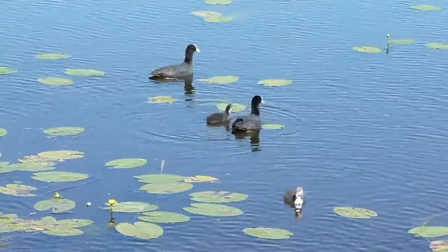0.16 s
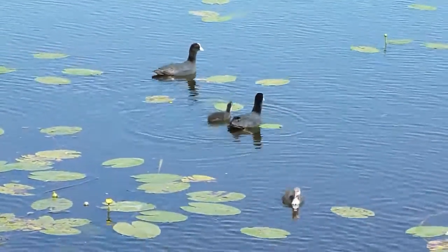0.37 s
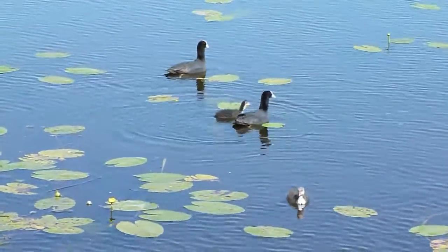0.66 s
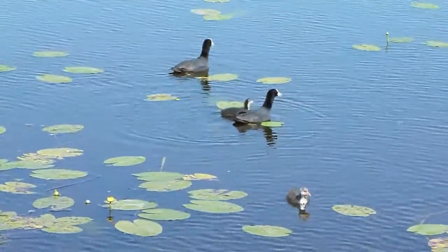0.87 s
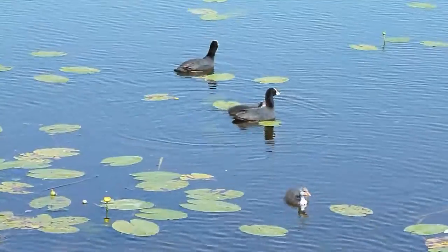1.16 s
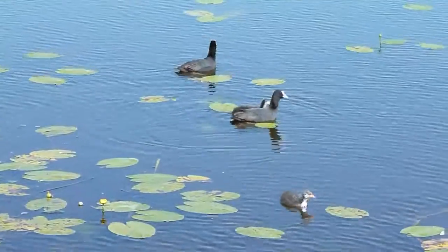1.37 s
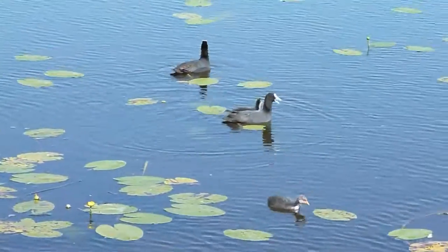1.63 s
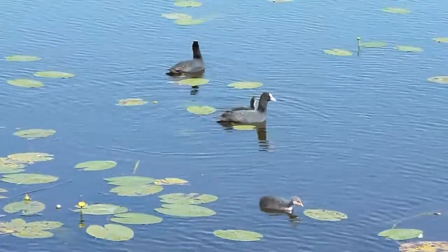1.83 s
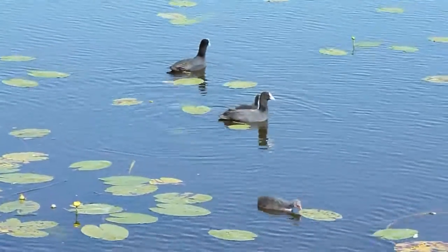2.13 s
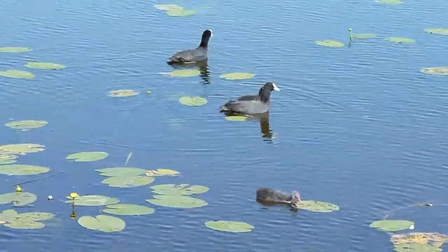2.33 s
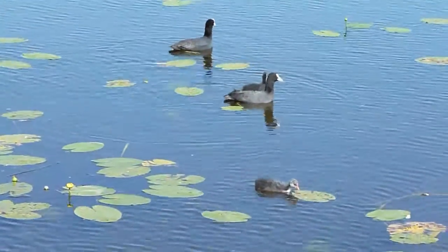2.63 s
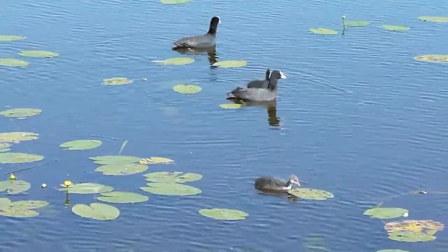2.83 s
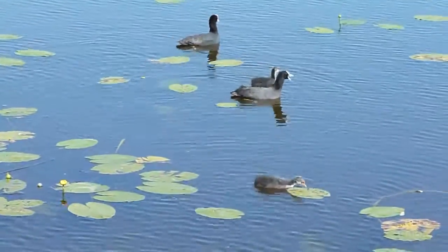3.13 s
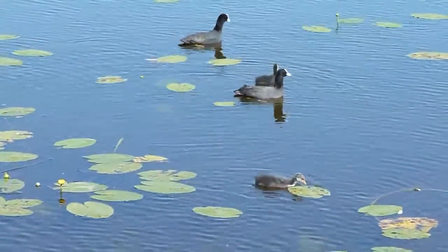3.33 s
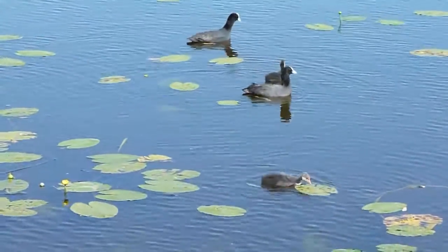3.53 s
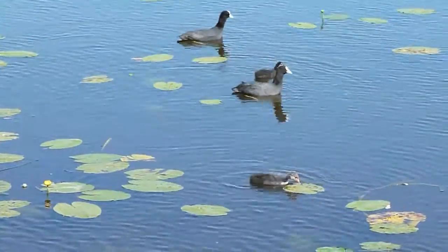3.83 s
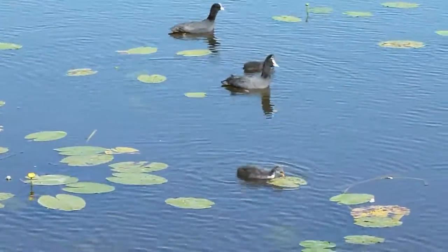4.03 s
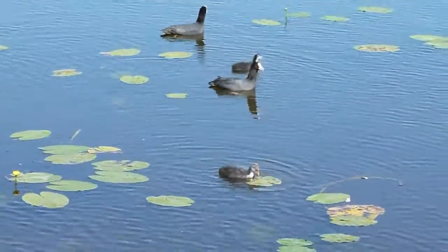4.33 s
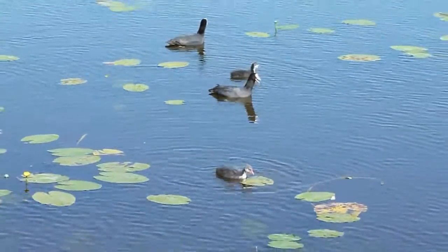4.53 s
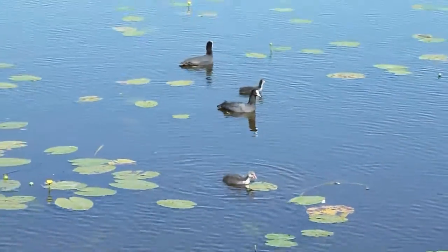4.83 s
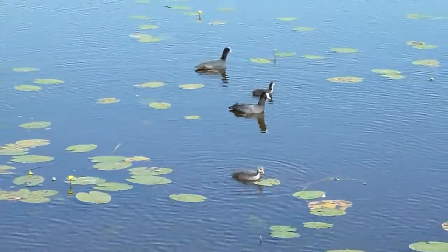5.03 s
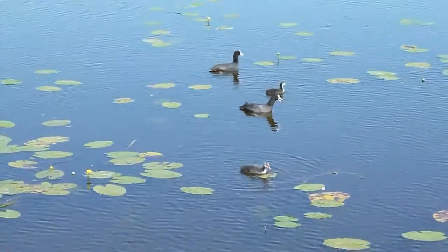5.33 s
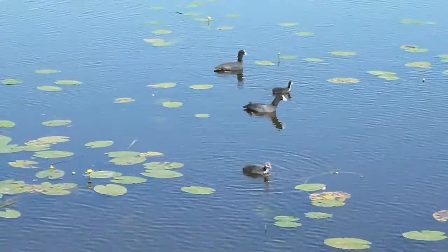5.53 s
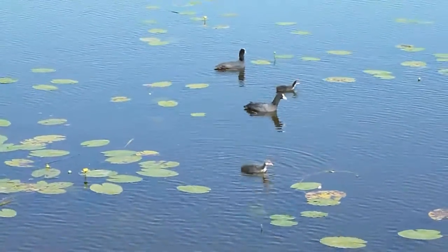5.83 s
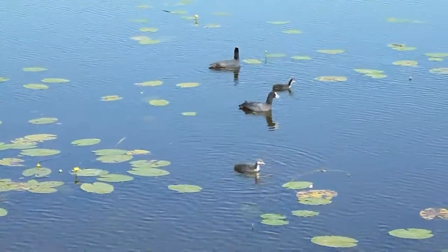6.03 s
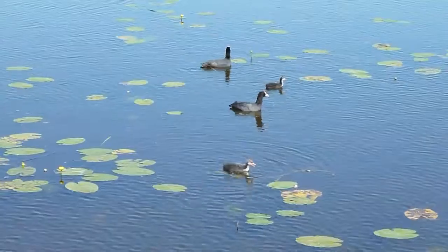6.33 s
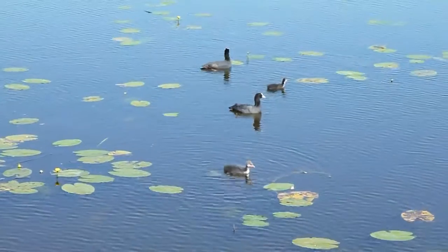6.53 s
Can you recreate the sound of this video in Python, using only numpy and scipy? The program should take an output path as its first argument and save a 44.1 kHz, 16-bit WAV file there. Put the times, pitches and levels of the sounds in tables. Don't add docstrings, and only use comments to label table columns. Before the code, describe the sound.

Outdoor water birds heard through a small, slightly dull stereo camera microphone. Low wind flutter opens over a chick's squealing whistle and yelp; one sharp songbird chip follows, then nasal parent pips spaced well apart. The calmer middle reveals faint engine hum, little water drips, body ticks and a quiet zoom motor. A piercing yelp comes near five seconds, and heavy wind buffets another yelp at the close. Faint echoes return from the banks.

```python
import sys
import numpy as np
from scipy import signal
from scipy.fft import rfft, irfft, next_fast_len
from scipy.io import wavfile
from scipy.ndimage import uniform_filter1d, map_coordinates

SR = 44100
rng = np.random.default_rng(int(sys.argv[2]) if len(sys.argv) > 2 else 0)


def wav_out(sig):
    wavfile.write(sys.argv[1], SR, np.round(np.clip(np.atleast_2d(sig).T, -1, 1) * 32767).astype(np.int16))


def gain_from_decibels(decibels):
    exponent = np.asarray(decibels, float) / 20
    return 10 ** exponent


N = 295166
T = np.arange(N) / SR

# time in seconds, pitch in Hz, level in dB.
SQUEALS = [
    [(0, 2734, -57.5), (.028, 3740, -63), (.06, 3620, -55.5), (.12, 3567, -53.5), (.17, 3644, -46.5),
     (.28, 3755, -47.5)],
    [(1.968, 2350, -65), (1.986, 3050, -50.5), (1.993, 3700, -51), (2.005, 3815, -46), (2.05, 3460, -50.5),
     (2.1, 3536, -42.5), (2.15, 3723, -41.5), (2.19, 4100, -45), (2.21, 4210, -51.5)],
    [(4.725, 4484, -69), (4.74, 4420, -54), (4.838, 4560, -50.5)],
    [(6.185, 2677, -77), (6.212, 3504, -61.5), (6.27, 3283, -68), (6.38, 3381, -60.5), (6.456, 3500, -54)],
]
# time in seconds, pitch in Hz, level in dB.
YELPS = [
    [(.296, 3670, -48), (.301, 3414, -46), (.35, 3456, -47.5), (.382, 3060, -42), (.392, 2560, -50),
     (.403, 2310, -48.5), (.412, 2340, -64)],
    [(2.232, 4220, -48), (2.254, 4060, -42), (2.263, 3647, -36.5), (2.29, 3300, -44), (2.31, 3030, -39),
     (2.331, 2160, -49), (2.34, 2230, -68)],
    [(4.843, 4605, -35.5), (4.849, 4093, -32), (4.882, 4015, -32), (4.889, 3726, -32), (4.91, 3300, -43.5),
     (4.916, 2700, -44), (4.93, 2360, -45.5), (4.94, 2370, -59.5), (4.96, 2240, -67)],
    [(6.461, 3903, -34.5), (6.478, 3913, -36.5), (6.5, 3844, -46), (6.532, 3620, -46.5), (6.554, 3330, -55),
     (6.564, 3070, -43.5), (6.572, 2630, -54), (6.584, 2410, -56), (6.594, 2280, -60)],
]
# time in seconds, pitch in Hz, level in dB.
ARCHES = [
    [(.405, 2960, -67), (.432, 3300, -57), (.475, 3100, -61), (.5, 2750, -63), (.52, 2045, -67)],
    [(2.41, 2710, -71), (2.5, 3070, -62), (2.56, 3250, -72), (2.59, 3090, -61), (2.61, 2783, -77)],
    [(6.503, 2760, -69), (6.512, 2840, -54), (6.54, 2900, -55), (6.553, 3080, -48), (6.56, 3120, -55)],
    [(.292, 1810, -64), (.3, 1827, -57), (.32, 1865, -54.5), (.34, 1890, -60), (.355, 2040, -59)],
    [(4.464, 2840, -68), (4.48, 2847, -56.5), (4.616, 2966, -51), (4.66, 2985, -52), (4.68, 2990, -55),
     (4.702, 2898, -49.5), (4.72, 2700, -64)],
    [(6.575, 2590, -63), (6.6, 2630, -63), (6.64, 2646, -67), (6.67, 2710, -60.5), (6.7, 2900, -55)],
]
# start in seconds, length in seconds, level in dB, first pitch in Hz, last pitch in Hz.
PEEPS = [
    (3.045, 0.046, -63.5, 3240, 3170),
    (4.884, 0.028, -38, 3150, 2913),
]
# time in seconds, pitch in Hz, level in dB.
CHIP = [(1.206, 5580, -58), (1.213, 5440, -37.5), (1.221, 5550, -32.5), (1.226, 4910, -36.5),
        (1.24, 4960, -35), (1.25, 4944, -35), (1.259, 4670, -39.5), (1.264, 4700, -69)]
# left minus right in dB, overtone lift in dB in the squeal, then in the yelp.
LONG_CALL_PLACES = [(1.5, 3, -0.6), (1, -11, 1), (3.5, -6, -1), (2.5, 20.5, -1)]
# left minus right in dB, overtone lift in dB.
SHORT_CALL_PLACES = [(2, -9), (4, -8), (.1, -9), (0, -18), (1.5, -23), (1, 2), (-1, 4), (0, -8), (-2, -2)]
# overtone frequency in Hz, level in dB re the tone.
THROAT = [(4000, -27), (5000, -10.5), (6200, -25), (7000, -30), (9000, -48.5)]
# start in seconds, length in seconds, rasp in dB re tone, half-pitch tone in dB re tone.
HOARSE_SPELLS = [(0.207, 0.09, -26, -9.5), (0.293, 0.052, -7, -40), (2.198, 0.012, -7.5, -8),
                 (2.21, 0.023, -18, -16), (4.888, 0.024, -15, -53), (6.512, 0.054, -11.5, -40),
                 (6.481, 0.09, -15, -46.5), (1.22, .008, -16, -50)]
# start in seconds, length in seconds, depth in dB re tone, rate in Hz.
FLUTTER_SPELLS = [(.235, .055, -18, 580), (0.31, 0.022, -14, 305.6), (0.33, 0.023, -14.5, 335),
                  (6.472, 0.03, -17.5, 220), (6.515, .03, -16, 750), (4.888, .022, -12.5, 560),
                  (.3, .05, -18, 1080)]

# start in seconds, length in seconds, level in dB, half rate in Hz,
# share of the length where the pulses turn uneven.
PIPS = [
    (1.695, 0.1, -34.5, 801, 0.57),
    (3.193, 0.1, -33, 794.4, 0.27),
    (4.589, 0.12, -32, 797.4, 0.306),
    (5.443, 0.13, -32.5, 784, 0.304),
    (6.154, 0.062, -53, 797, 1),
]
# octave in dB re main tone, brightness in dB re level,
# half-rate tone in dB re main tone, change along the pip in dB.
PIP_COLOUR = [(-23, -16, -12, 0), (-14.5, -13, -4.5, -1), (-20.5, -16.5, -6.5, -11),
              (-10, -19.5, -5.5, -10.5), (-19, -25, -11, -4)]
# share of the length, level step in dB,
# octave change in dB along the pip.
PIP_STEP = [(0.65, 2, -5), (0.25, -4, -3), (0.27, -3, 10), (0.19, 2, -7), (.9, -1, -14)]
# multiple of the half rate, level in dB re the control that drives it.
LOW_ODD = [(1, 0.8), (3, 0.078)]
HIGH_EVEN = [(6, -10.5), (8, -0.5), (10, 5.5)]
HIGH_ODD = [(5, -14), (7, -3), (9, 5)]

# echo delay in seconds, level in dB, spread in seconds.
BANKS = [(.02, -25, .015), (.07, -31, .02), (.118, -32, .014), (.16, -35.5, .015), (.24, -35, .025)]
# frequency in Hz, level in dB.
BANK_COLOUR = [(800, 2), (1600, -7), (2400, 1.5), (3300, -1), (4100, -6), (5000, -1.5)]

# time in seconds, level in dB.
GUSTS = [(0, -44), (.55, -42.5), (.64, -57.5), (.78, -44), (1.28, -48.5), (1.38, -79.5), (1.62, -47.5),
         (1.75, -70), (5.05, -72), (5.18, -45.5), (5.4, -66.5), (5.53, -45), (5.7, -71), (6.13, -61),
         (6.22, -39.5), (6.5, -40.5), (6.55, -56.5), (6.69, -41)]
# frequency in Hz, level in dB.
BUFFET = [(15, -8), (30, 3), (60, 10.5), (110, 8.5), (200, -10), (350, -9.5), (600, -39.5), (1200, -65.5)]
# frequency in Hz, level in dB.
EDDY_SNAP = [(20, -27), (60, -1.5), (150, -4.5), (350, 5), (700, -18.5), (1500, -51), (4000, -61)]
# time in seconds, left peak in dB, right peak in dB, left swing in Hz,
# right swing in Hz.
STRONG_EDDIES = [(0.03, -20.5, -29, 129, 120), (0.062, -22.5, -33.5, 109, 103), (0.08, -15, -19.5, 155, 169),
                 (0.094, -22, -25.5, 185, 141), (0.109, -16, -25.5, 184, 200), (0.139, -26, -33, 103, 101),
                 (0.202, -28, -22.5, 118, 202), (0.222, -9.5, -13.5, 220, 185),
                 (0.234, -17.5, -18, 149, 155), (0.246, -14.5, -28.5, 156, 162),
                 (0.259, -18.5, -27, 130, 158), (0.277, -28.5, -15, 153, 145), (0.289, -23.5, -16, 200, 270),
                 (0.314, -18.5, -19, 160, 145), (0.338, -27.5, -18.5, 161, 125),
                 (0.364, -22.5, -27.5, 136, 132), (0.396, -23.5, -32.5, 205, 146),
                 (0.407, -22, -19.5, 156, 149), (0.431, -18, -17.5, 164, 121), (0.455, -23.5, -35, 109, 140),
                 (0.48, -25.5, -38.5, 112, 105.5), (0.511, -26.5, -22, 89, 107),
                 (0.535, -28, -33.5, 108, 82), (0.57, -29, -33, 124, 97), (0.794, -34.5, -27.4, 112, 102),
                 (0.809, -29.5, -21.5, 144, 101), (0.83, -32, -29.5, 92, 128), (0.904, -25.5, -38, 189, 144),
                 (0.924, -27.5, -21.5, 215, 117), (0.938, -7.5, -14, 182, 186),
                 (0.958, -25.5, -24, 182, 161), (0.975, -16.5, -23, 188, 188), (0.988, -37, -27, 189, 187),
                 (1.005, -29.5, -25.5, 95.6, 132), (1.041, -31, -18.5, 190, 150),
                 (1.053, -27, -24, 123, 86.5), (1.066, -32, -19, 196, 114), (1.082, -39, -24.5, 113, 74),
                 (1.094, -22, -32.5, 161, 161), (1.253, -30.5, -17.5, 200, 165),
                 (5.15, -35, -30, 83, 103), (5.178, -29.5, -40.5, 129, 205), (5.193, -29.5, -37.5, 132, 186),
               (5.211, -29.5, -35, 123, 105), (5.277, -38.1, -31.5, 109, 114), (5.31, -32, -31.5, 128, 154),
               (5.338, -35, -28, 147, 114), (5.509, -35.5, -28, 228, 122), (5.533, -38.2, -28.5, 146, 94),
               (5.55, -37.5, -29.5, 132, 127), (5.568, -34.5, -35.5, 121, 192),
               (5.592, -39, -30.5, 172, 100), (5.952, -38, -40.5, 195, 193),
               (6.033, -36.5, -37.5, 175, 176), (6.179, -17, -24.5, 217, 185),
               (6.201, -23.5, -21.5, 107, 156), (6.221, -21.5, -30.5, 70, 112),
               (6.233, -18, -26.5, 105, 114), (6.246, -16.5, -20, 237, 244), (6.26, -29.5, -21, 101, 150),
               (6.275, -16, -18, 161, 105), (6.296, -27.5, -16, 190, 169), (6.313, -26, -19.5, 191, 124),
               (6.336, -21, -15.5, 161, 172), (6.35, -12, -12, 203, 189), (6.364, -20, -22.5, 191, 150),
               (6.383, -19, -26.5, 150, 225), (6.396, -17, -24.2, 156, 178), (6.412, -30.5, -20.5, 81, 159),
               (6.435, -24, -30.5, 153, 149), (6.454, -23, -28.5, 131, 186),
               (6.481, -17, -16.5, 139.5, 120), (6.501, -12, -13.5, 116, 297),
               (6.524, -24.5, -23, 167, 165), (6.538, -29.5, -39.5, 110, 80), (6.593, -27, -32, 149, 211),
               (6.606, -12.5, -18, 172, 150), (6.622, -18, -23.5, 115, 172), (6.636, -18.5, -17, 211, 194),
               (6.652, -29.5, -38.5, 145, 351),
                 (1.014, -25, -38, 110, 120), (1.115, -29.5, -30.5, 120, 110), (1.262, -32, -22.5, 85, 98.6),
                (6.468, -21, -27.5, 130, 110), (6.491, -13, -11.5, 105, 98), (6.511, -20, -17.5, 201, 129),
                (6.614, -13.5, -19, 125, 190), (6.68, -22.5, -25, 160, 140)]

# time in seconds, level in dB, gear teeth per second.
ZOOM = [
    (4.312, -101, 100),
    (4.322, -55.5, 92),
    (4.45, -56, 99),
    (5.27, -57, 110),
    (5.295, -62, 42),
    (5.31, -92, 54),
]
# frequency in Hz, width in Hz, level in dB.
SHELL = [(2200, 550, -3), (3200, 600, 3.5), (4420, 1200, -2.5), (5350, 390, -2), (6900, 360, -8)]
# time
# in seconds, peak in dB, centre in Hz.
TICKS = [(3.371, -38, 3000), (3.498, -31, 3170), (3.501, -33, 1495), (4.336, -37, 3200), (4.718, -36, 4000),
         (4.321, -43, 3160), (4.344, -33, 2000), (4.346, -31.5, 3980), (4.98, -36, 2400),
         (5.005, -35.5, 5370), (5.83, -40, 2900), (6.4915, -38, 2300), (6.484, -44, 4500)]
# time in seconds, jump in dB, left minus right in dB.
JOLTS = [(6.478, -19.5, -11), (6.483, -17, 13), (6.4895, -19.5, 8), (6.4925, -12.5, -16),
         (6.495, -13.5, -3), (6.4985, -14, 5), (6.605, -14.5, 26)]

# time in seconds, peak in dB, bubble ring in Hz.
DRIPS = [(3.37, -41.5, 1290), (3.894, -41.5, 940), (4.034, -43, 965), (4.344, -44, 1120),
         (4.402, -42.5, 1010), (4.716, -40, 1060), (5.829, -42, 1500)]

# time in seconds, firing tone in dB, second order in dB.
ENGINE = [(0, -54, -59.5), (1.5, -57, -60), (2.5, -57, -54), (3.3, -58, -49.5), (4.15, -54.5, -46.5),
          (4.7, -58, -48.5), (5.3, -55.5, -52), (5.9, -53.5, -47), (6.69, -56, -46)]
# multiple of the firing rate, level in dB re second order.
UPPER_ORDERS = [(2, -0.5), (2.27, -9.5), (3, -11), (4, -16), (4.5, -19.5)]

# frequency in Hz, level in dB.
AIR = [(25, -30), (60, -8.5), (120, -8), (250, -9.5), (500, -15.5), (1000, -22), (2000, -28), (3500, -29),
       (6500, -32.5), (10000, -39)]
# frequency in Hz, side minus mid in dB.
AIR_SIDE = [(80, -9.5), (200, -9.5), (490, 2), (1400, 9), (3000, 8), (7000, 0)]
# time in seconds, level in dB.
AIR_LEVEL = [(0, -63), (3.9, -62.5), (5, -64.5), (5.6, -63), (6.2, -62.5), (6.47, -63.5), (6.52, -67),
             (6.69, -63.5)]

# frequency in Hz, level in dB.
MIC = [(6200, 0), (7100, -6), (7600, -13.5), (7950, -34.5), (8100, -90.5)]
# frequency in Hz, level in dB.
MIRROR = [(7900, -89), (8100, -32), (8500, -19.5), (9000, -21), (9750, -29.5), (10100, -51.5), (10600, -90)]
# frequency in Hz, level in dB.
HISS = [(10900, -140), (11150, -94.5), (15600, -94.5), (15800, -140)]


def unit(x):
    return x / np.sqrt(np.mean(x ** 2) + 1e-20)


def along(points, hz):
    f, v = np.transpose(points)
    return np.interp(np.log(hz + 1), np.log(f + 1), v)


def curves(rows, t=T):
    s, *cols = np.transpose(rows)
    return [np.interp(t, s, c) for c in cols]


def wobble(rate, size=N):
    knots = rng.standard_normal(int(size * rate / SR) + 4)
    return map_coordinates(knots, [np.arange(size) * rate / SR])


def filtered(x, response):
    m = next_fast_len(N + SR // 4)
    return irfft(rfft(x, m) * response(np.fft.rfftfreq(m, 1 / SR)), m)[..., :N]


def panned(x, pan_db):
    lean = np.tanh(pan_db * np.log(10) / 40)
    return np.array([x * (1 + lean), x * (1 - lean)])


def span(start, end):
    where = slice(round(start * SR), min(N, round(end * SR)))
    t = T[where]
    return where, t, np.sqrt(2) * np.clip(np.minimum(t - t[0], t[-1] - t) / 0.0051, 0, 1)


def spell_fade(t, s, length):
    return 1506 * np.maximum(np.maximum(s - t, t - s - length), 0)


def whistle(rows, place, break_s=0):
    pan_db, *lifts_db = place
    where, t, edge = span(rows[0][0], rows[-1][0])
    size = len(t)
    hz, db = curves(rows, t)
    hz = uniform_filter1d(hz, size=200) * (1 + 0.0022 * wobble(90, size=size))
    turn = 2 * np.pi * np.cumsum(hz) / SR

    s, length, *tops = np.transpose(HOARSE_SPELLS)[..., None]
    rasp_db, half_db = [np.max(top - spell_fade(t, s, length), axis=0) for top in tops]
    rough = wobble(700, size=size) + 1j * wobble(900, size=size) + .8j * wobble(3000, size=size)
    rasp = gain_from_decibels(np.maximum(rasp_db, -28)) * rough

    beat = np.cumsum(1 + .12 * wobble(150, size=size)) / SR
    flutter = 0
    for at, hold, depth_db, rate_hz in FLUTTER_SPELLS:
        depth = gain_from_decibels(depth_db - spell_fade(t, at, hold))
        flutter = flutter + depth * 2 * np.cos(2 * np.pi * rate_hz * beat)

    voice = np.exp(1j * turn) + gain_from_decibels(half_db) * np.exp(.5j * turn)
    tone = np.imag((1 + flutter) * (1 + rasp) * voice)
    lift_db = np.where(t < break_s, lifts_db[0], lifts_db[-1])
    overtone = gain_from_decibels(lift_db + along(THROAT, 2 * hz)) * np.sin(2 * turn)
    level = gain_from_decibels(db + 1.33 * wobble(120, size=size))
    out = np.zeros((2, N))
    out[:, where] = panned(edge * level * (tone + overtone), pan_db)
    return out


def peep(s, length, db, from_hz, to_hz):
    edge_db = db - 8.5
    return [(s, from_hz, edge_db), (s + 0.24 * length, from_hz, db),
            (s + (1 - 0.066) * length, to_hz, db), (s + length, to_hz * (1 - 0.18), edge_db)]


def chicks():
    out = np.zeros((2, N))
    for squeal, yelp, place in zip(SQUEALS, YELPS, LONG_CALL_PLACES):
        out += whistle(squeal + yelp, place, break_s=squeal[-1][0])
    short_calls = ARCHES + [peep(*row) for row in PEEPS]
    for rows, place in zip(short_calls, SHORT_CALL_PLACES[1:]):
        out += whistle(rows, place)
    return out


def parent():
    out = np.zeros(N)
    for pip, colour, step in zip(PIPS, PIP_COLOUR, PIP_STEP):
        s, length, level_db, base_hz, turn_at = pip
        octave_db, bright_db, split_db, sag_db = colour
        step_at, step_db, tilt_db = step
        where, t, edge = span(s, s + length)
        size = len(t)
        u = (t - s) / length

        past = u - turn_at - 0.04
        strain = np.exp(-(past / np.where(past < 0, 0.058, 0.3)) ** 2)
        hz = base_hz * (1 + 0.1156 * max(.56 - turn_at, 0) * strain)
        turn = 2 * np.pi * np.cumsum(hz * (1 + 0.0038 * wobble(170, size=size))) / SR

        attack_s, release_s = 0.019, 0.045
        rise = np.maximum(1 - (t - s) / attack_s, 0)
        fall = np.maximum(1 - (s + length - t) / release_s, 0)
        main_db = level_db - 22.5 * rise ** 1.9 - 26 * fall ** 1.25 + sag_db * u
        even = np.clip((turn_at - u) * length / 0.023, 0, 1)
        uneven_db = split_db - 29.5 * even - 14.5 * fall
        half_db = main_db + uneven_db
        bright_db = level_db + bright_db - 37 * ((u - .37) / 0.41) ** 2

        stepped = np.clip((u - step_at) * length / 0.0038, 0, 1)
        partials = [(2, main_db + step_db * stepped)]
        partials += [(4, main_db + octave_db + tilt_db * u + 3 * wobble(65, size=size))]
        partials += [(k, half_db + db) for k, db in LOW_ODD]
        partials += [(k, bright_db + db) for k, db in HIGH_EVEN]
        partials += [(k, bright_db + uneven_db + db) for k, db in HIGH_ODD]
        for k, db in partials:
            level = gain_from_decibels(db + 0.65 * wobble(89, size=size))
            out[where] += edge * level * np.cos(round(k) * turn + .05 * k * k)

    def stereo(hz):
        lean_db = along([(800, 0.3), (2400, -0.5), (6500, 0.87)], hz)
        return gain_from_decibels(np.array([[.5], [-.5]]) * lean_db) * np.exp(np.array([[.1j], [-.1j]]))
    return filtered(out, stereo)


def songbird():
    return whistle(CHIP, SHORT_CALL_PLACES[0])


def banks(x):
    t = T[:SR // 2]
    spread = gain_from_decibels(-50.0 - 60 * t / 0.45)
    for s, db, width in BANKS:
        spread = spread + gain_from_decibels(db) * np.exp(-((t - s) / width) ** 2) / np.sqrt(width * SR)
    thin = filtered(x.mean(0), lambda hz: gain_from_decibels(along(BANK_COLOUR, hz)))
    answer = spread * rng.standard_normal((2, len(t)))
    shimmer = gain_from_decibels(3.5 * np.array([wobble(45), wobble(45)]))
    return shimmer * signal.fftconvolve(thin[None], answer, axes=1)[:, :N]


def wind():
    swings, snaps = np.zeros((2, N + 4000)), np.zeros((2, N))
    t = np.arange(-2000, 2000) / SR
    shed_per_s = 38
    count = int(N / SR * shed_per_s) - 1
    rows = STRONG_EDDIES
    phases = rng.random(len(rows))
    for port in range(2):
        times = (np.arange(count) + rng.random(count)) / shed_per_s
        chance = rng.standard_normal((count, 2))
        small_db = curves(GUSTS, times)[0] + 6.5 + 3 * chance[:, 0]
        small_hz = 145 * np.exp(0.26 * chance[:, 1])
        small = zip(times, small_db, small_hz, rng.random(count))
        strong = [(row[0], row[1 + port], row[3 + port], phase + port / 4) for row, phase in zip(rows, phases)]
        for s, db, hz, phase in strong + list(small):
            start = round(s * SR)
            sag = 1 - 0.18 * np.tanh(hz * t / 2) * 2
            swing = np.cos(2 * np.pi * (hz * t * sag + phase))
            swings[port, start:][:len(t)] += gain_from_decibels(db) * np.exp(-(hz * t / .88) ** 2) * swing
            snaps[port, start] += gain_from_decibels(1.68 * db + 30.5)
    lumps = gain_from_decibels(5.7 * np.array([wobble(25), wobble(25)])) * rng.standard_normal((2, N))
    buffet = gain_from_decibels(curves(GUSTS)[0] + 7.5) * unit(filtered(lumps, lambda hz: gain_from_decibels(along(BUFFET, hz))))
    eddies = filtered(swings[:, 2000:2000 + N], lambda hz: 1 / (1 + 45 / (1j * hz + 1e-9)) ** 2)
    return eddies + buffet + filtered(snaps, lambda hz: 1j * gain_from_decibels(along(EDDY_SNAP, hz)))


def zoom_motor():
    db, rate = curves(ZOOM)
    count = np.cumsum(rate * (1 + 0.017 * wobble(40))) / SR + 0.29
    knocks = np.diff(np.floor(count), prepend=0) * gain_from_decibels(1.9 * wobble(100))
    hiss = (gain_from_decibels(-60 * (count % 1) / .55) + .3) * rng.standard_normal((2, N))

    def shell(f):
        modes = 0
        for k, (c, w, gain_db) in enumerate(SHELL):
            modes = modes + (-1) ** k * gain_from_decibels(gain_db) * 1j * f * w / (c * c - f * f + 1j * f * w)
        return modes
    mid, side = gain_from_decibels(db) * unit(filtered(hiss + [[20], [9]] * knocks, shell))
    return np.array([mid + 1.0 * side, mid - 3.36 * side])


def body_ticks():
    out, t = np.zeros((2, N)), T[:300]
    for s, peak_db, hz in TICKS:
        ring = gain_from_decibels(-60 * t / 0.0029) * np.cos(2 * np.pi * hz * t)
        burst = 0.5 * gain_from_decibels(-60 * t / 0.0073) * rng.standard_normal((2, 300))
        out[:, round(s * SR):][:, :300] += gain_from_decibels(peak_db) * (ring + burst) * [[.6], [1.4]]
    return out


def input_jolts():
    out, t = np.zeros((2, N)), T[:400]
    jump = np.exp(-t / 0.0023) - np.exp(-t / 0.00036)
    for k, (s, jump_db, pan_db) in enumerate(JOLTS):
        out[:, round(s * SR):][:, :400] += panned((-1) ** k * gain_from_decibels(jump_db) * jump, pan_db)
    return out


def drips():
    out, t = np.zeros(N), T[:2000]
    fall_s = 0.00074
    for s, db, hz in DRIPS:
        click = .45 * gain_from_decibels(-60 * t / 0.0023) * np.sin(2 * np.pi * 2.8 * hz * t)
        turn = 2 * np.pi * hz * (t + 0.99 * fall_s * (1 - np.exp(-t / fall_s)))
        out[round(s * SR):][:len(t)] += gain_from_decibels(db) * (gain_from_decibels(-60 * t / 0.028) * np.cos(turn) + click)
    return out


def engine():
    first_db, second_db = curves(ENGINE)
    firing_hz = 97.1 * (1 + .002 * (wobble(1) + wobble(8)))
    turn = 2 * np.pi * np.cumsum(firing_hz) / SR
    out = gain_from_decibels(first_db + 6 + 2.5 * wobble(12)) * np.sin(turn)
    for k, db in UPPER_ORDERS:
        out += gain_from_decibels(second_db + 1.5 + db + 2.2 * wobble(30)) * np.sin(k * turn)
    return out


def air():
    drift = gain_from_decibels(curves(AIR_LEVEL)[0] + .7 * wobble(5.37))

    def tilt(hz):
        colour = gain_from_decibels(along(AIR, hz) - along(AIR, 1032) + 17.0)
        return colour * [np.ones_like(hz), gain_from_decibels(along(AIR_SIDE, hz))]
    mid, side = drift * filtered(rng.standard_normal((2, N)), tilt)
    return np.array([mid + side, mid - side])


def scene():
    pips = parent()
    birds = chicks() + pips + songbird()
    breath = gain_from_decibels(-28) * wobble(1200) * pips
    handling = zoom_motor() + body_ticks() + input_jolts()
    return birds + breath + banks(birds) + wind() + handling + drips() + engine() + air()


def low_pass(x):
    return signal.sosfilt(signal.butter(12, 15700, fs=SR, output="sos"), x)


def record(dry):
    inner_hz = 16000
    folded = 2 * dry * np.cos(2 * np.pi * inner_hz * T)
    image = filtered(folded, lambda hz: gain_from_decibels(along(MIRROR, hz)))
    direct = filtered(dry, lambda hz: gain_from_decibels(along(MIC, hz)))
    hiss = filtered(rng.standard_normal(dry.shape), lambda hz: gain_from_decibels(along(HISS, hz)))
    return low_pass(direct + image + hiss)


dry = scene()
out = record(dry)
wav_out(out)
```